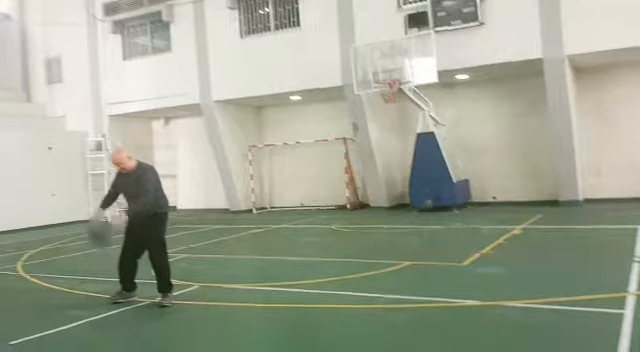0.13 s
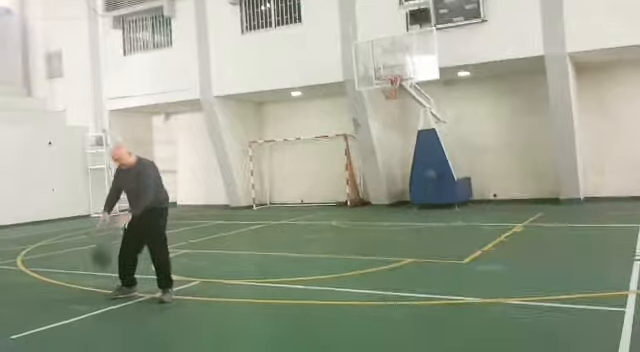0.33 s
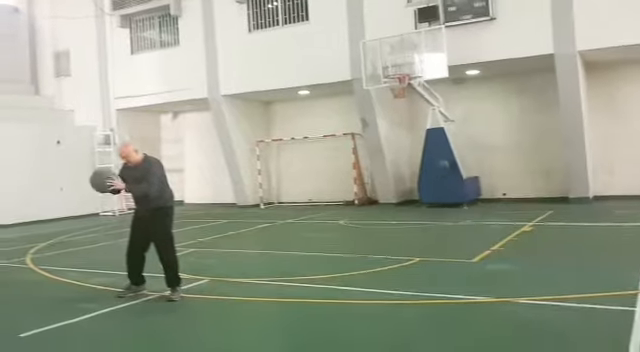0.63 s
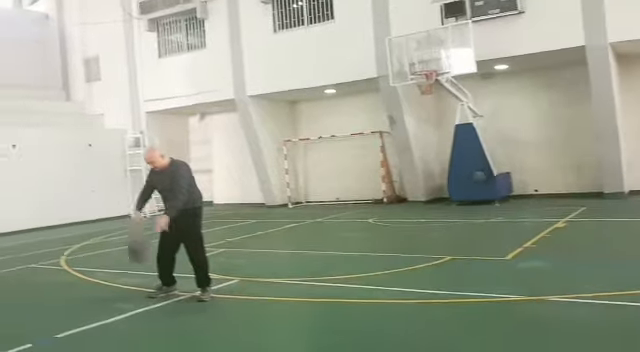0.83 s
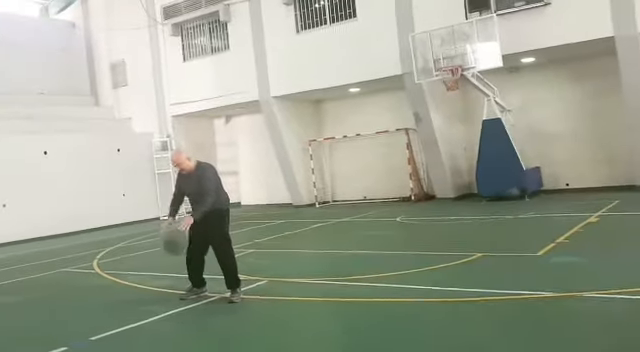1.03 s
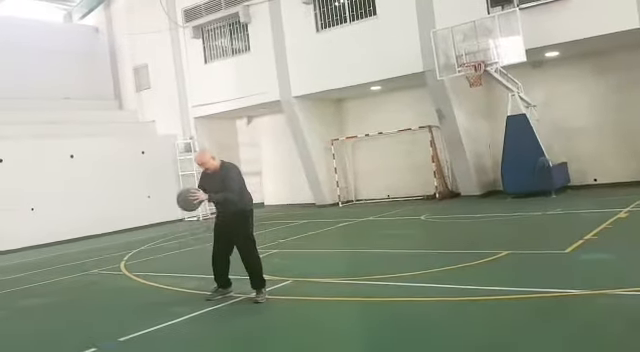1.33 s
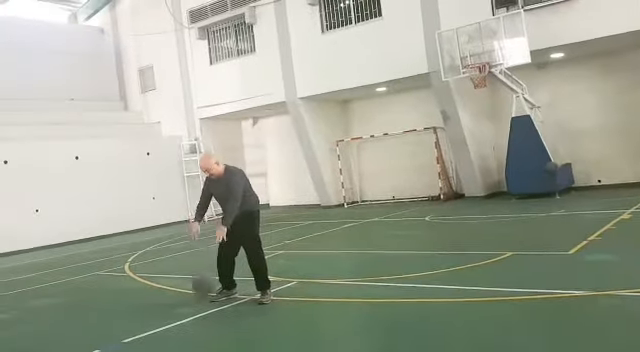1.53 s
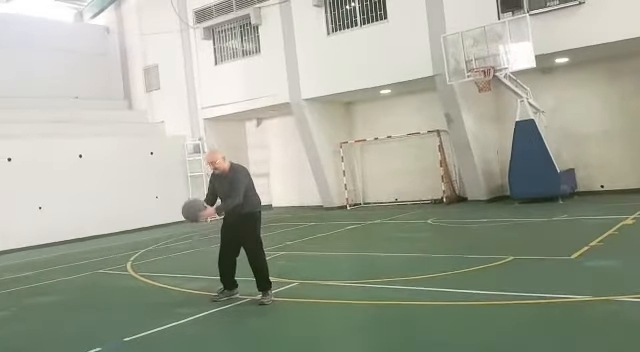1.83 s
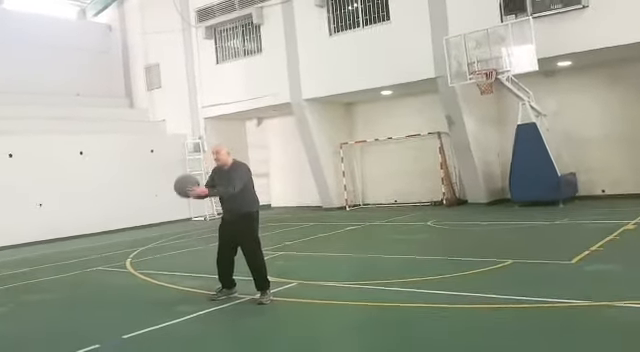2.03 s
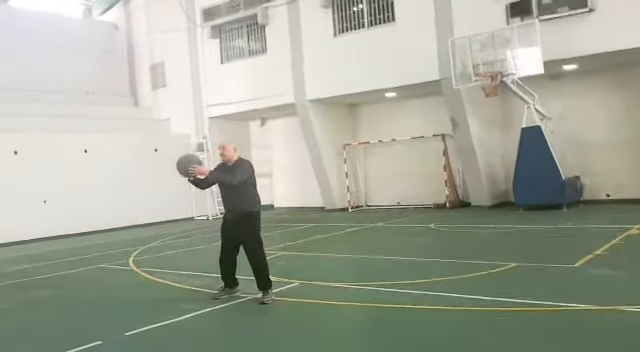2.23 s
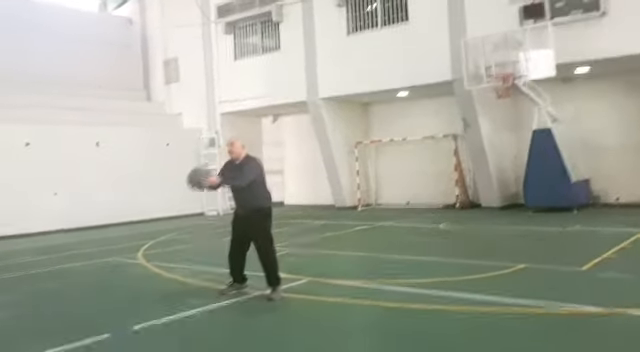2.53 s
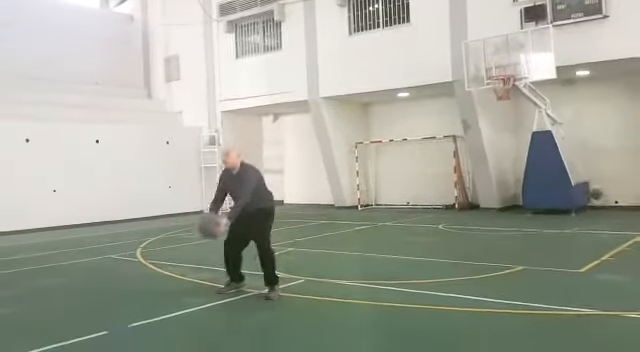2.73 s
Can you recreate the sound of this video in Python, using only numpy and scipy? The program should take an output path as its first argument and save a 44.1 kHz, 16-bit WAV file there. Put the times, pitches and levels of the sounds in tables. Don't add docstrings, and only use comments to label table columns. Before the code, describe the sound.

A basketball bounces three times on a hard gym floor, echoing through a large hall

```python
import sys
import numpy as np
from scipy import signal
from scipy.fft import rfft, irfft, next_fast_len
from scipy.io import wavfile
from scipy.ndimage import uniform_filter1d

SR = 44100
rng = np.random.default_rng(int(sys.argv[2]) if len(sys.argv) > 2 else 0)


def wav_record(signal):
    frames = np.transpose(np.atleast_2d(signal))
    bounded = np.clip(frames, -1, 1)
    quanta = np.round(bounded * 32767).astype(np.int16)
    wavfile.write(sys.argv[1], SR, quanta)


def voltage_ratio(decibels):
    exponent = np.asarray(decibels, float) / 20
    return 10 ** exponent


N = 127890
LEAD = SR

# start in seconds, strength in dB, ping in dB, crack in dB, hall in dB.
BOUNCES = [
    (-.97, -8.5, 4, -23, -27),
    (-.32, -16.5, -11, -23, -27),
    (.3457, -11, -15, -22, -28),
    (1.0136, -11.5, -9.5, -25.5, -26.5),
    (1.6635, -12.5, -4, -25.5, -27.5),
]
# start in seconds, click in
# dB, second click in dB, thump in dB, hall in dB.
KNOCKS = [
    (0.2225, -25.5, -28.5, -20.5, -33),
    (1.8826, -33, -55, -38, -38.5),
    (2.538, -36.5, -37, -29, -39.5),
]
# pitch in Hz, level in dB.
KNOCK_TONE = [(300, 0), (1200, 4), (2200, -3), (4000, 1), (6500, 2), (9000, -6), (16000, -18)]
# pitch in Hz, level in dB.
KNOCK_HALL = [(100, 1), (1000, 1.5), (3000, 2), (5200, 5.5), (7000, -8.5), (10000, -6)]
# pitch in Hz, level in dB, time to fall by 60 dB in seconds.
AIR_RINGS = [(1116, -3.5, 0.039), (1429, -9, 0.049), (2133, -7, 0.023), (2800, -24, .025),
             (3290, -19, 0.02), (4090, -18.5, 0.022), (5220, -23, 0.03), (8100, -37.5, 0.022)]
# pitch in Hz, level in dB.
CRACK_TONE = [(500, -4), (1500, 0.5), (3000, 6.5), (6000, -7), (8000, -14.5), (10500, -23.5),
              (15000, -21.5), (16500, -15.5)]
ECHO_DELAYS = [.0262, .036, .0508, .102, .162]
ECHO_TREBLE_DB = [-14, -32, -14, -21, -36]
# bass level in dB, left minus right in dB.
ECHO_BASS = [(-13, 4), (-12, -3.5), (-14, -0.5), (-24.5, 2), (-15, 0.5)]
# pitch in Hz, level in dB.
ECHO_TONE = [(300, -25), (1000, -14), (2500, -9), (5000, 3), (8000, 2), (16000, 2)]
# pitch in Hz, time to fall by 60 dB in seconds.
HALL_T60 = [(60, 4.1), (250, 5.77), (600, 6.02), (1500, 4.7), (3000, 2.74), (5000, 1.57), (8000, 0.57),
            (14000, 0.4)]
# pitch in Hz, level in dB per Hz.
HALL_COLOUR = [(25, -39), (45, -21), (78, -5), (115, -1.5), (175, -5.5), (240, -10.5), (300, -19),
               (480, -14.5),
               (600, -24), (800, -28), (1200, -24.5), (2300, -27.5), (4500, -36.5), (7000, -48), (10000, -54),
             (16000, -61)]
# pitch in Hz, likeness from 0 to 1.
ALIKE = [(60, .97), (150, 0.97), (350, 0.9), (700, 0.42), (1400, 0), (3000, 0), (8000, 0)]
# pitch in Hz, left minus right in dB.
PORTS = [(60, 1.76), (700, 1.04), (1400, -0.4), (3000, 1), (5000, 7), (6500, -8), (8500, -13.5),
         (13000, -2.5)]
# pitch in Hz, level in dB.
HISS_TONE = [(4000, -30.5), (7000, -28), (9500, -8.5), (10500, -5), (13000, 0), (15500, 0), (16000, -6)]
# pitch in Hz, level in dB.
MURMUR_TONE = [(30, -18), (100, 7), (450, -1.5), (800, -25), (2000, -14.5), (5000, -37.5), (8000, -53.5)]

SLAP_DB, SLAP_S, SLAP_HZ = 3, 0.00013, 1900
INNER_S, INNER_DB = 0.0008, -6
CRACK_T60, TICK_DB, TICK_T60 = 0.0296, 11, 0.0025
KNOCK_CRACK_DB, SECOND_S = -15.5, 0.0112
SQUASH_HZ, FIRST_TOP_S, FLAT = 118, 0.0025, 0.1
RISE_S, CONTACT_S, LIFT_S = 0.0003, 0.0128, 0.00089
AFTER_DB, AFTER_HZ, AFTER_T60 = -6.5, 225.7, 0.021
PEEL_S, PEEL_DB = 0.0102, -10
LATE_MS, LATE_MS_PER_S = 0.15, -0.075
ECHO_BASS_HZ = 298
HALL_WAIT_S, HALL_FILL_S, PATCHY_DB = 0.011, 0.023, 1.5
BRIGHT, USUAL_CRACK_DB, BRIGHT_HZ = 0.4, -24, 2500
RUB_S, RUB_HALF_S, RUB_HZ, RUB_WIDE_HZ, RUB_DB = 2.46, 0.13, 6350, 330, -89
MURMUR_DB, HISS_DB = -50.5, -74.5
LOW_HZ, TOP_HZ = 42, 15900
START_S, FADE_S = 0.071, 0.011


def unit(x):
    return x / np.sqrt(np.mean(x ** 2) + 1e-20)


def along(points, hz):
    f, v = np.transpose(points)
    return np.interp(np.log(hz + 1), np.log(f + 1), v)


def filtered(x, response):
    n = x.shape[-1]
    m = next_fast_len(n + 8192)
    return irfft(rfft(x, m) * response(np.fft.rfftfreq(m, 1 / SR)), m)[..., :n]


def coloured(x, points):
    return filtered(x, lambda hz: voltage_ratio(along(points, hz)))


def paired(pair):
    def shares(hz):
        turn = np.arccos(np.clip(along(ALIKE, hz), -1, 1)) / 2
        return np.array([np.cos(turn), np.sin(turn)])
    mid, side = filtered(pair, shares)
    return np.array([mid + side, mid - side])


def room_tone():
    noise = paired(rng.standard_normal((2, N + SR)))
    return voltage_ratio(MURMUR_DB) * unit(coloured(noise, MURMUR_TONE))[:, :N]


def rub():
    noise = rng.standard_normal((2, N))
    hiss = unit(filtered(noise, lambda hz: np.exp(-((hz - RUB_HZ) / RUB_WIDE_HZ) ** 2)))
    strokes = voltage_ratio(3.5 * unit(uniform_filter1d(rng.standard_normal(N), size=1200)))
    swell = np.exp(-((np.arange(N) / SR - RUB_S) / RUB_HALF_S) ** 4)
    return voltage_ratio(RUB_DB) * hiss * strokes * swell


def walls(hz):
    bass = 1 / (1 + (hz / ECHO_BASS_HZ) ** 4)
    treble = voltage_ratio(along(ECHO_TONE, hz))
    total = 0
    for s, treble_db, (bass_db, pan_db) in zip(ECHO_DELAYS, ECHO_TREBLE_DB, ECHO_BASS):
        colour = voltage_ratio(treble_db) * treble + voltage_ratio(bass_db) * bass
        sides = voltage_ratio([[pan_db / 2], [-pan_db / 2]])
        total = total + colour * sides * np.exp(-2j * np.pi * hz * s)
    return total


def hall():
    noise = unit(coloured(paired(rng.standard_normal((2, 4 * SR))), HALL_COLOUR))
    hz, t, z = signal.stft(noise, SR, nperseg=256)
    patches = uniform_filter1d(uniform_filter1d(rng.standard_normal(z.shape[1:]), 4, 0), 12, 1)
    fill = 1 - np.exp(-np.maximum(t - HALL_WAIT_S, 0) / HALL_FILL_S)
    decay_db = -60 * t / along(HALL_T60, hz)[:, None]
    return signal.istft(z * fill * voltage_ratio(PATCHY_DB * unit(patches) + decay_db), SR, nperseg=256)[1]


def add(out, s, x, tail):
    i = round((s - 1 / 1000) * SR) + LEAD
    n = min(out.shape[1] - i, tail.shape[1])
    out[:, i:i + n] += tail[:, :n]
    late_s = max(LATE_MS + LATE_MS_PER_S * s, 0) / 1000
    delays = np.array([[0], [late_s]])
    near = filtered(np.array([x, x]), lambda hz: np.exp(-2j * np.pi * hz * delays) + walls(hz))
    out[:, i:i + len(x)] += near


def kick(u, wide):
    bell = np.exp(-(u / SLAP_S / wide) ** 2 / np.where(u > 0, 3, 1))
    return -bell * np.cos(2 * np.pi * SLAP_HZ * u / wide)


def snap(t, at, crack_db):
    u = t - at
    after = np.maximum(u, 0)
    noise = unit(coloured(rng.standard_normal(len(t)), CRACK_TONE))
    fade = voltage_ratio(-60 * after / CRACK_T60) + voltage_ratio(TICK_DB - 60 * after / TICK_T60)
    crack = voltage_ratio(crack_db) * fade * noise * (u >= 0)
    return kick(u, 1) + voltage_ratio(INNER_DB) * kick(u - INNER_S, 1.56) + crack


def thump(t):
    rise = 1 - np.exp(-np.maximum(t, 0) / RISE_S)
    held = rise / (1 + np.exp(np.clip((t - CONTACT_S) / LIFT_S, -50, 50)))
    turn = 2 * np.pi * SQUASH_HZ * (t - FIRST_TOP_S)
    swing = held * (np.cos(turn) - FLAT * np.cos(3 * turn))
    u = np.maximum(t - CONTACT_S, 0)
    return swing + voltage_ratio(AFTER_DB - 60 * u / AFTER_T60) * np.sin(2 * np.pi * AFTER_HZ * u)


def air_ping(t):
    u = np.maximum(t, 0)
    ping = np.zeros(len(t))
    for hz, db, t60 in AIR_RINGS:
        level = voltage_ratio(db + rng.normal(0, 0.5) - 60 * u / t60)
        ping -= level * np.cos(2 * np.pi * hz * u + rng.normal(0.73, 0.35))
    return ping * (1 - np.exp(-u / 0.0011))


def bounce(t, ping_db, crack_db):
    slap = voltage_ratio(SLAP_DB) * snap(t, 0, crack_db)
    peel = voltage_ratio(PEEL_DB) * uniform_filter1d(snap(t, PEEL_S, crack_db + 7.5), size=5)
    return thump(t) + slap - peel + voltage_ratio(ping_db) * air_ping(t)


def knock(t, db, second_db, thump_db):
    clicks = voltage_ratio(db) * snap(t, 0, KNOCK_CRACK_DB) + voltage_ratio(second_db) * snap(t, SECOND_S, KNOCK_CRACK_DB)
    return coloured(clicks, KNOCK_TONE) + voltage_ratio(thump_db) * thump(t)


def ball():
    out = np.zeros((2, N + LEAD))
    t = np.arange(SR // 4) / SR - 1 / 1000
    for s, db, ping_db, crack_db, hall_db in BOUNCES:
        extra_db = BRIGHT * (crack_db - USUAL_CRACK_DB)
        tail = filtered(hall(), lambda hz: voltage_ratio(hall_db + extra_db * hz ** 2 / (hz ** 2 + BRIGHT_HZ ** 2)))
        add(out, s, voltage_ratio(db) * bounce(t, ping_db, crack_db), tail)
    for s, db, second_db, thump_db, hall_db in KNOCKS:
        tail = voltage_ratio(hall_db) * coloured(hall(), KNOCK_HALL)
        add(out, s, knock(t, db, second_db, thump_db), tail)
    return out[:, LEAD:]


def scene():
    return room_tone() + rub() + ball()


def band_limit(x):
    return signal.sosfilt(signal.butter(12, 16620, fs=SR, output="sos"), x)


def record(dry):
    padded = np.pad(dry, ((0, 0), (0, SR // 10)), "reflect")
    halves = np.array([[0.5], [-0.5]])
    x = filtered(padded, lambda hz: voltage_ratio(along(PORTS, hz) * halves))
    x = x + voltage_ratio(HISS_DB) * unit(coloured(rng.standard_normal(x.shape), HISS_TONE))
    x = filtered(x, lambda hz: 1 / np.sqrt(1 + (LOW_HZ / (hz + 1)) ** 6) / (1 + (hz / TOP_HZ) ** 60))
    fade = np.clip((np.arange(N) / SR - START_S) / FADE_S, 0, 1) ** 2
    return band_limit(x[:, :N] * fade)


dry = scene()
out = record(dry)
wav_record(out)
```